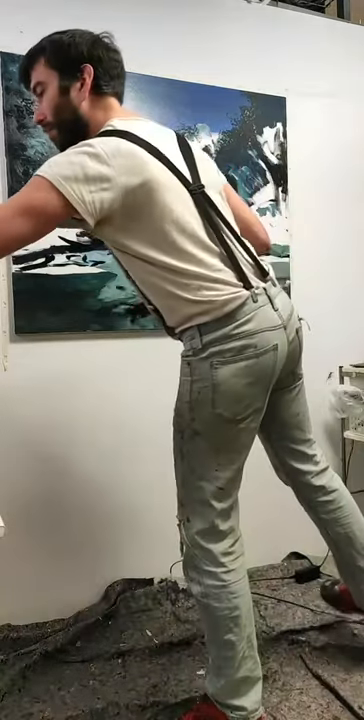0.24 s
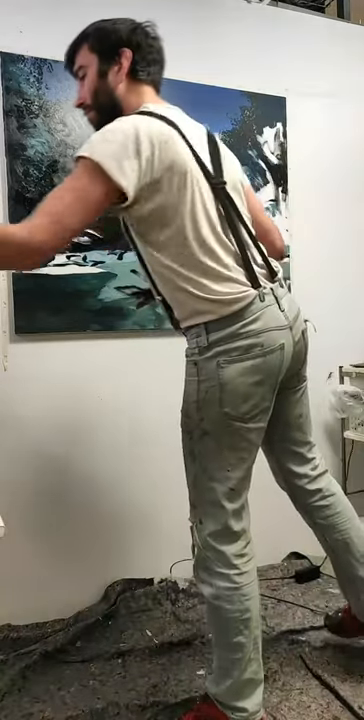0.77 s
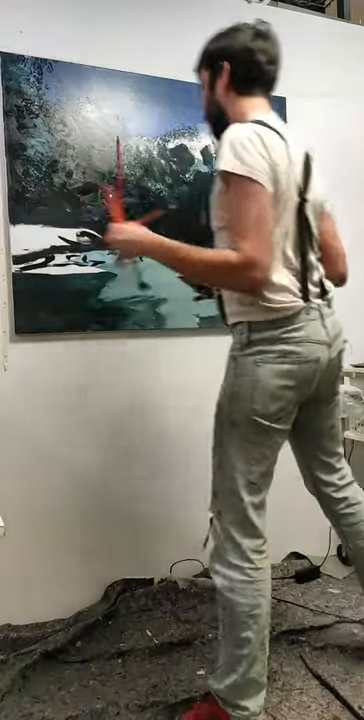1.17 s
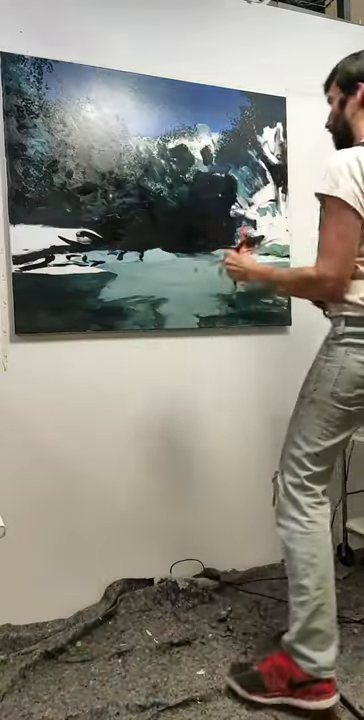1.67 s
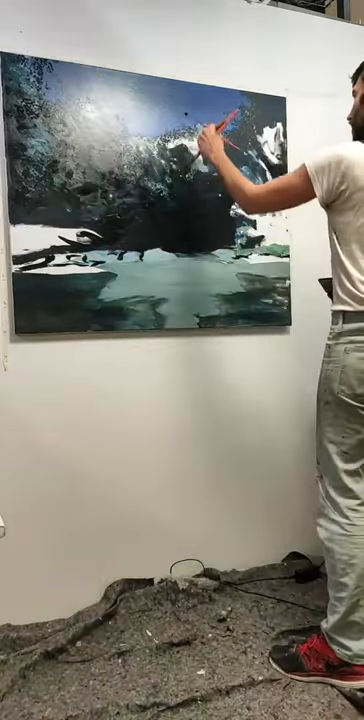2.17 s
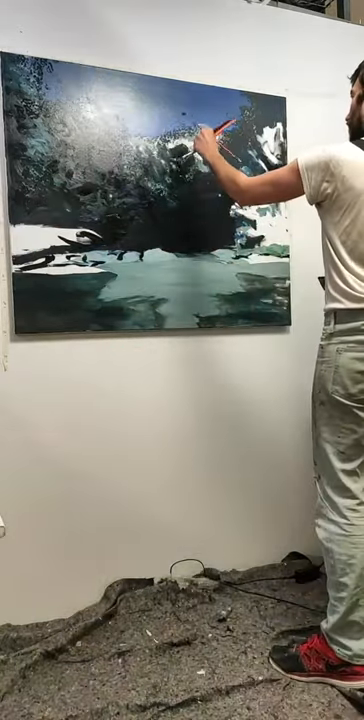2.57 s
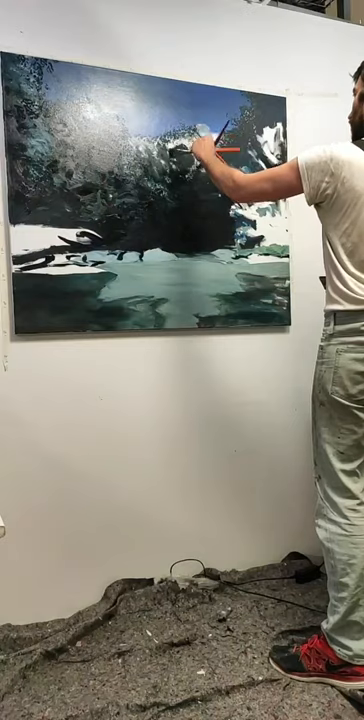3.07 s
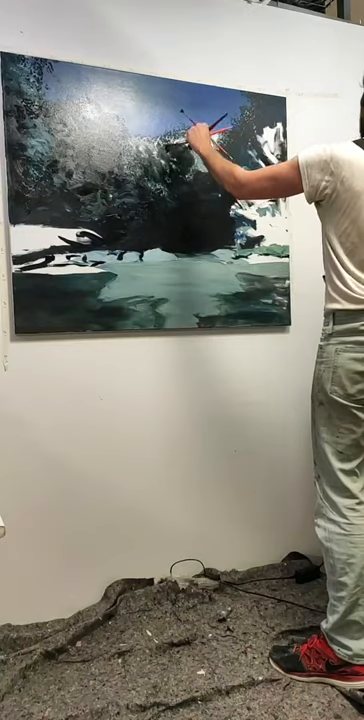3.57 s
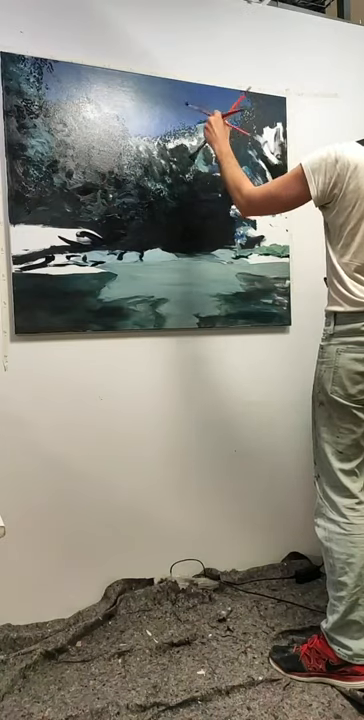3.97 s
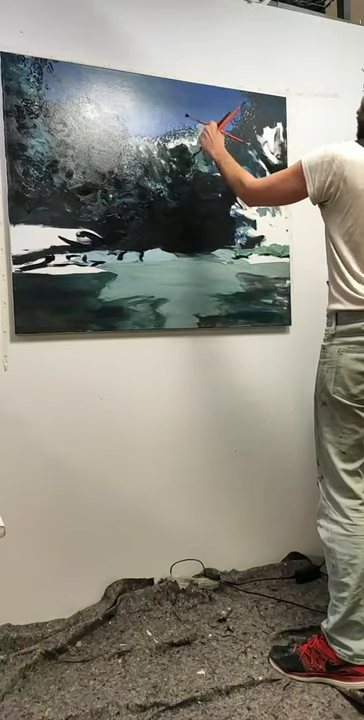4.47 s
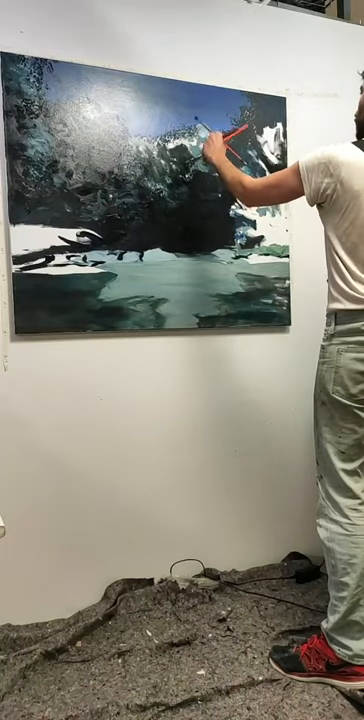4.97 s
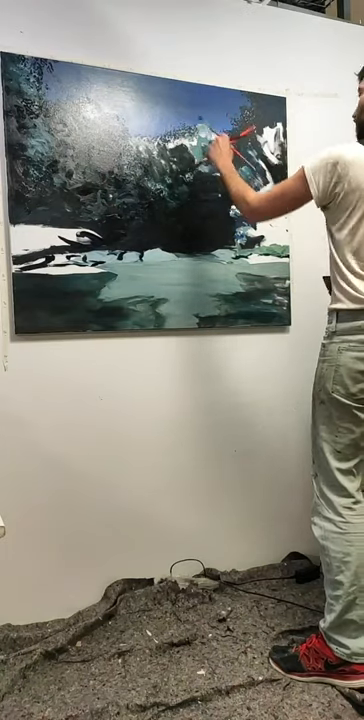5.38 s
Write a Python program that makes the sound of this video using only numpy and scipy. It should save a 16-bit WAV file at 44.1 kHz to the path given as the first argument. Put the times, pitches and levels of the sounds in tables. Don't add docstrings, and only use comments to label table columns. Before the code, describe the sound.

A small studio hums with soft ventilation: airy wash, deep wavering gusts near 56 Hz and a very faint fan tone throughout, the hiss settling over the first second or so. Tiny ticks at 0.1 s precede a short, jerky jar scrape shaking a wooden table at 0.31-0.4 s. At 1.1 s thin brush handles strike with the loudest sound, a bright double clack with a bounce, slight metal ring and short room echo. Clothes rustle around 1.35 and 1.75 s; softer wooden knocks fall at 1.5-1.6 s, a dull one at 1.83 s. From 2.3 to 3.4 s bristles scrub the canvas, faint at first, then quicker and crisper, with muffled cloth thumps and slow subsonic sway. Near quiet follows, with barely audible ticks around 4 s. Strokes return at 4.4-5.05 s, strongest from 4.7. Light rustle and a faint fuzzy squeak come near 5.4 s, then only hum.

```python
import sys
import numpy as np
from scipy import signal
from scipy.fft import rfft, irfft, next_fast_len
from scipy.io import wavfile
from scipy.ndimage import uniform_filter1d

SR = 44100
rng = np.random.default_rng(int(sys.argv[2]) if len(sys.argv) > 2 else 0)


def output_pcm(signal):
    pcm = np.clip(np.atleast_2d(signal).T, -1, 1) * 32767
    wavfile.write(sys.argv[1], SR, np.round(pcm).astype(np.int16))


def attenuation_scalar(level_db):
    decades = np.asarray(level_db, float) / 20
    return 10 ** decades


N = 248724
T = np.arange(N) / SR


def evened(x):
    return x / np.sqrt(np.mean(x ** 2) + 1e-20)


def read(points, hz):
    f, value = np.transpose(points)
    return np.interp(np.log(hz + 1), np.log(f + 1), value)


def colour(x, gain_db):
    size = next_fast_len(len(x))
    gain = attenuation_scalar(gain_db(np.fft.rfftfreq(size, 1 / SR)))
    return irfft(rfft(x, size) * gain, size)[:len(x)]


def favour(hz, centre_hz, octaves):
    return np.exp(-.5 * (np.log2(hz / centre_hz + 1e-3) / octaves) ** 2)


def resonate(x, hz, width):
    r = np.exp(-np.pi * width / SR)
    pole = r * np.exp(2j * np.pi * hz / SR)
    return 2 * signal.lfilter([1 - r], [1, -pole], x + 1e-18).real


def body(x, modes):
    out = 0
    for k, (hz, width, db) in enumerate(modes):
        out = out + (-1) ** k * attenuation_scalar(db) * resonate(x, hz, width)
    return out


def grit(per_s, spread_db):
    size = attenuation_scalar(spread_db * np.minimum(rng.exponential(1, N), 5)) * rng.standard_normal(N)
    return evened(size * (rng.random(N) < per_s / SR))


def speed(s, rise, fall):
    return np.exp(-.5 * ((T - s) / np.where(T < s, rise, fall)) ** 2)


def swells(rows, rise, fall):
    return sum(attenuation_scalar(db) * speed(s, rise, fall) for s, db in rows)


def patchy(x, patchy_db, frames, bins):
    z = signal.stft(x, nperseg=512)[2]
    across_hz = uniform_filter1d(rng.standard_normal(z.shape), bins, 0)
    patches = uniform_filter1d(across_hz, frames, 1)
    return signal.istft(z * attenuation_scalar(patchy_db * evened(patches)), nperseg=512)[1][:N]


def place(s, db, sound):
    out = np.zeros(N + len(sound))
    out[round(s * SR):][:len(sound)] = attenuation_scalar(db) * sound / abs(sound).max()
    return out[:N]


def knock(s, db, centre_hz, octaves, damping, modes):
    t, ring = T[:14000], 0
    for k, (hz, width, mode_db) in enumerate(modes):
        decay = np.exp(-np.pi * damping * width * t)
        level = favour(hz, centre_hz, octaves) * attenuation_scalar(mode_db)
        ring = ring + level * decay * np.sin(2 * np.pi * hz * t + k ** 2)
    return place(s, db, ring * np.minimum(t * 3000, 1))


# frequency in Hz, time to die by 60 dB in seconds.
ROOM_T60 = [(100, 0.54), (500, 0.43), (2000, 0.41), (5000, 0.33), (9000, 0.27), (14000, 0.2)]


def room(x):
    taps = np.zeros(SR // 2)
    at = np.arange(150, SR // 2 - 10, 10) + rng.integers(0, 10, (SR // 2 - 151) // 10)
    taps[at] = rng.choice([-1., 1.], at.shape)
    hz, t, z = signal.stft(taps, SR, nperseg=256)
    decay = attenuation_scalar(-60 * t / read(ROOM_T60, hz)[:, None])
    near_walls = 1 + 1.68 * np.exp(-t / 0.01)
    tail = signal.istft(z * decay * near_walls, SR, nperseg=256)[1]
    return signal.fftconvolve(x, tail / np.linalg.norm(tail))[:N]


# frequency in Hz, density in dB per Hz.
AIR_SPECTRUM = [(5, -3), (17, -1), (32, -18.5), (65, -11.5), (119, -21.5), (170, -20.5), (320, -21),
                (520, -28.5), (950, -27.5), (1400, -32), (2200, -36.5), (5000, -41.5), (9500, -46.5),
                (13500, -42.5)]


def air_wash():
    stir_db, still_db, settle_s = 10, -7, 1
    frames, hz = N // 256 + 5, np.fft.rfftfreq(1024, 1 / SR)
    patches = uniform_filter1d(rng.standard_normal((frames, 513)), 10, 0)
    patches_db = 1.5 * evened(uniform_filter1d(patches, 12, 1)).T
    treble_db = still_db + stir_db * np.exp(-np.arange(frames) * 256 / SR / settle_s)
    treble_share = np.clip(np.log2(hz / 700 + 0.011) / 2.4, 0, 1)[:, None]
    noise = rng.standard_normal((frames - 1) * 256)
    hiss = evened(colour(noise, lambda f: read(AIR_SPECTRUM, f)))
    z = signal.stft(hiss, nperseg=1024, noverlap=768)[2]
    z = z * attenuation_scalar(patches_db + treble_db * treble_share)
    return attenuation_scalar(-54.5) * signal.istft(z, nperseg=1024, noverlap=768)[1][:N]


# frequency in Hz, width in Hz, level in dB.
HUM_MODES = [(20.64, 3.3, -5.5), (30.1, 2.2, -6.5), (65.8, 5.4, -1), (90.3, 9, -7), (110.4, 7, -10),
             (197.4, 2.6, -18)]


def room_hum():
    hum = 0
    for hz, width, db in HUM_MODES:
        hum = hum + attenuation_scalar(db) * evened(resonate(rng.standard_normal(N), hz, width))
    return attenuation_scalar(-52.5) * hum


def wavering_tone(hz):
    return np.sqrt(2) * np.sin(2 * np.pi * np.cumsum(hz) / SR)


# peak time in seconds, level in dB.
GUSTS = [(.11, -60), (.54, -44.5), (.8, -50.5), (.98, -49), (1.2, -49.5), (1.4, -48.5), (1.64, -45.5),
         (1.88, -54), (2.19, -47), (2.55, -48.5), (2.87, -41.5), (3.07, -52), (3.33, -54), (3.58, -45.5),
         (3.86, -52.5), (4.15, -46.5), (4.45, -50.5), (4.64, -45), (4.8, -59), (4.96, -45), (5.12, -49),
         (5.3, -43), (5.63, -42.5)]


def gust_boom(waver):
    rise_s, fall_s, calm_db = 0.079, 0.07, -72
    return (swells(GUSTS, rise_s, fall_s) + attenuation_scalar(calm_db)) * wavering_tone(55.96 + 1.48 * waver)


# time in seconds, level in dB.
FAN_LEVEL = [(0, -66), (.35, -66), (.85, -84), (1.2, -64.5), (1.55, -67.5), (2.65, -61), (3.15, -65),
             (3.55, -59), (5.15, -62), (5.64, -68)]


def fan_whine(waver):
    level_db = np.interp(T, *np.transpose(FAN_LEVEL))
    return attenuation_scalar(level_db) * wavering_tone(149.4 + 1.3 * waver)


def ventilation():
    noise = air_wash() + room_hum()
    waver = evened(uniform_filter1d(rng.standard_normal(N), size=8000))
    return noise + gust_boom(waver) + fan_whine(waver[::-1])


# frequency in Hz, density in dB per Hz.
BRISTLE_SPECTRUM = [(600, -6.5), (1200, -8.5), (1800, -9.5), (2800, -8), (4100, -5), (5500, -5.5),
                    (6800, -4), (8300, -3), (11000, -6), (13500, -6)]


def rubbing(rows, per_s, spread_db):
    hiss = colour(grit(per_s, spread_db), lambda hz: read(BRISTLE_SPECTRUM, hz))
    hiss = evened(patchy(hiss, patchy_db=1.8, frames=4, bins=8))
    dull = colour(hiss, lambda hz: -10 * np.log10(1 + (hz / 5500) ** 4))
    bright = hiss - dull
    out = np.zeros(N)
    for s, db, rise, fall, bright_db in rows:
        blend = attenuation_scalar(-bright_db) * dull + attenuation_scalar(bright_db) * bright
        out += attenuation_scalar(db) * speed(s, rise, fall) * blend
    return out


# time of top speed in seconds, level in dB, rise in seconds, fall in seconds,
# brightness in dB (added to the bright share, taken off the dull one).
RUSTLE_STROKES = [(.03, -76, .02, 0.058, -9), (.13, -82, 0.021, 0.022, -3), (.233, -68, 0.0082, 0.018, -7),
                  (1.033, -56.5, 0.003, 0.041, -1.5), (1.348, -52, 0.015, 0.024, -1),
                  (1.383, -61, 0.014, 0.035, -4.5), (1.66, -60.5, 0.099, 0.029, -5),
                  (1.742, -49, 0.026, 0.029, -3), (1.94, -70.5, 0.033, 0.037, 2),
                  (1.83, -62, 0.035, 0.027, -5), (5.35, -64, 0.04, 0.03, -2),
                  (5.4, -65, 0.027, 0.033, -1.5), (5.535, -62, 0.007, 0.025, -1), (5.2, -73.5, .08, .1, 0),
                  (5.6, -71.5, 0.1, .1, -4), (1.27, -61.5, .04, 0.036, -1)]


def rustle():
    return rubbing(RUSTLE_STROKES, per_s=14000, spread_db=0.3)


# peak time in seconds, level in dB.
SQUEAK_RUBS = [
    (5.413, -68),
    (5.447, -71),
]


def squeak():
    whistle = evened(resonate(rng.standard_normal(N), 2200, 130))
    return swells(SQUEAK_RUBS, rise=.006, fall=0.015) * whistle


# frequency in Hz, width in Hz, level in dB.
TABLE_MODES = [(196, 71, -6.5), (295, 27, 0.5), (348, 43, 0), (452, 65, -2), (538, 137, -9),
               (680, 210, -12.5), (840, 110, -12.5), (1125, 150, -17), (1650, 180, -22.5), (2200, 190, -23),
               (2950, 530, -25.5)]


def jar():
    start_s, top_s, stop_s = .314, 0.345, .39
    start_db, top_db, stop_db, fade_db_per_s = -37, -30, -35, 415
    slip_db = np.interp(T, [start_s, top_s, stop_s], [start_db, top_db, stop_db])
    slip_db = slip_db - fade_db_per_s * np.maximum(T - stop_s, 0)
    gate = uniform_filter1d(1. * (T > start_s), size=100)
    slips = grit(per_s=2500, spread_db=0.0)
    wood = body(gate * attenuation_scalar(slip_db) * slips, TABLE_MODES) / np.std(body(slips, TABLE_MODES))
    fizz = colour(grit(per_s=15000, spread_db=-2.0), lambda hz: -3.0 * abs(np.log2(hz / 3000 + 0.056)))
    fizz_db = -43.5 + 1.5 * (slip_db - top_db)
    return wood + gate * attenuation_scalar(fizz_db) * evened(fizz)


# start in seconds, level in dB, favoured pitch in Hz, spread in octaves,
# decay in seconds.
DRY_TICKS = [(0.1058, -42.5, 1060, 0.3, 0.0018), (0.106, -41, 2750, .25, .002),
             (.125, -51, 384, 0.57, 0.044), (.256, -58, 4500, .5, 0.00078),
             (0.317, -40, 2780, 0.22, 0.0015), (1.0282, -47, 6000, 1.1, .006),
             (1.0953, -17, 5900, 1.6, 0.0042), (1.096, -22, 8500, 1.3, 0.021),
             (1.185, -48, 230, 0.15, 0.019), (1.381, -50, 9000, .5, .0006),
             (1.5021, -37, 2200, 1.2, 0.0015), (1.555, -36.5, 8950, 0.35, 0.0026),
             (1.559, -38.5, 4030, 0.089, .007), (1.628, -46, 2800, 0.65, 0.0012),
             (1.706, -57, 6500, .5, .001), (3.92, -63, 5500, 0.55, 0.0052), (4.02, -64, 4530, 0.73, .004),
             (5.405, -55, 2800, 0.57, 0.0032), (1.0962, -44, 1000, .4, 0.0019),
             (1.826, -44, 1320, .2, 0.0058), (1.505, -42.5, 2120, 0.097, .004)]


def tick(s, db, centre_hz, octaves, decay):
    lead, t = 200, T[:3000]
    burst = (1 + rng.standard_normal(len(t)) ** 2) * rng.choice([-1, 1], len(t))
    puff = np.r_[np.zeros(lead), burst * np.exp(-t / decay)]
    puff = colour(puff, lambda hz: 20 * np.log10(favour(hz, centre_hz, octaves) + 1e-5))
    return place(s - lead / SR, db, puff)


def dry_ticks():
    return sum(tick(*row) for row in DRY_TICKS)


# start in seconds, level in dB, favoured pitch in Hz,
# spread in octaves, grip damping factor.
FERRULE_BLOWS = [
    (1.0985, -24, 5500, 2.5, 1.7),
    (1.505, -39, 3800, 0.91, 1.2),
    (1.556, -47, 5000, .5, 1.1),
]
# frequency in Hz, width in Hz, level in dB.
FERRULE_MODES = [(3370, 20, 0.5), (4640, 12, -3), (5050, 4.5, -7), (5100, 6.8, -14), (7400, 18, -9),
                 (9400, 16, -9), (8920, 18, -5)]


def ferrule_rings():
    return sum(knock(*row, FERRULE_MODES) for row in FERRULE_BLOWS)


# start in seconds, level in dB, favoured pitch in Hz, spread in octaves,
# grip damping factor.
SOFT_BLOWS = [
    (1.5045, -24, 3750, 0.77, 1.3),
    (1.521, -38, 4200, 1.8, 3.4),
    (1.555, -32, 6500, 0.49, 2.8),
    (1.583, -45, 6030, 0.35, 1.4),
    (1.825, -41, 2500, 0.79, 3.5),
]
# frequency in Hz, width in Hz, level in dB.
THICK_HANDLE_MODES = [(1220, 46, -3.5), (1580, 210, 0), (2100, 210, -9.5), (3380, 130, 0), (4100, 270, -16),
                      (4730, 100, -19), (5090, 78, -7.5), (6860, 120, -8), (8600, 210, -5),
                      (10560, 270, -2), (12000, 500, -21)]


def soft_clacks():
    return sum(knock(*row, THICK_HANDLE_MODES) for row in SOFT_BLOWS)


# start in seconds, level in dB, favoured pitch in Hz, spread in octaves,
# grip damping factor.
HARD_BLOWS = [
    (1.0944, -19, 8500, 0.64, 2.1),
    (1.0986, -16, 5100, 1.2, 2.1),
    (1.1075, -27, 5000, 0.88, 1.5),
]
# frequency in Hz, width in Hz, level in dB.
HANDLE_MODES = [(1830, 220, -0.5), (2200, 350, 1.5), (2730, 180, -11), (3470, 140, -0.5), (4830, 88, -2),
                (5050, 140, 7), (5890, 210, 4.5), (6500, 330, 3.5), (7550, 200, 1), (8480, 190, 2.5),
                (9530, 89, 5), (10000, 330, 6.5), (11170, 390, 6), (12300, 880, -15)]


def handle_clacks():
    return sum(knock(*row, HANDLE_MODES) for row in HARD_BLOWS)


# peak time in seconds, rocking level in dB.
CANVAS_SHOVES = [
    (2.41, -33),
    (2.82, -30),
    (3.0, -43.5),
    (3.26, -36),
    (3.52, -41.5),
    (4.56, -37),
    (4.85, -39.5),
    (5.15, -47),
]


def canvas_sway():
    sway_hz, rise_s, fall_s, rest_db = 10.8, 0.082, .1, -55.5
    sway = np.sin(2 * np.pi * sway_hz * T) + 0.072 * np.sin(2 * np.pi * 3.1 * sway_hz * T)
    return np.sqrt(2) * (swells(CANVAS_SHOVES, rise_s, fall_s) + attenuation_scalar(rest_db)) * sway


# start in seconds, level in dB, favoured pitch in Hz.
LANDINGS = [(2.27, -44, 730), (2.583, -41, 520), (2.64, -52, 617), (3.269, -43.5, 710), (3.345, -52, 800),
            (4.405, -51, 560), (4.46, -47, 520), (4.605, -45.5, 680), (4.69, -46, 626), (4.79, -48.5, 680),
            (4.99, -47, 526)]
# frequency in Hz, width in Hz, level in dB.
CLOTH_MODES = [(524, 33, 4), (665, 79, 1.5), (817, 72, -1), (902, 110, -3.5), (1172, 29, 1),
               (1538, 28, -5.5)]


def brush_landings():
    return sum(knock(s, db, hz, 0.39, 1.0, CLOTH_MODES) for s, db, hz in LANDINGS)


# time of top speed in seconds, bristle hiss in dB, rise in seconds, brightness in
# dB (added to the bright share, taken off the dull one).
SCRUB_STROKES = [(2.31, -61, 0.031, -2), (2.385, -67, 0.024, -1.5), (2.609, -59, 0.018, .4),
                 (2.656, -58.5, 0.012, -1.5), (2.762, -59.5, 0.017, -2.5), (2.856, -47.5, 0.013, 0.7),
                 (2.97, -55.5, 0.02, -4), (3.074, -51.5, 0.016, -4), (3.171, -47.5, .015, -2),
                 (3.265, -45.5, 0.014, -2), (3.344, -45, 0.015, -0.4), (4.496, -56.5, 0.04, -5.5),
                 (4.62, -54.5, 0.021, -6), (4.701, -44, 0.015, -1.7), (4.823, -44, 0.022, -1.3),
                 (4.909, -45, 0.013, -0.4), (5.027, -45.5, 0.028, -.6)]


def canvas_scrub():
    drum_db, drum_per_hiss_db, usual_hiss_db = -57.5, 0.38, -51.5
    lead_s = 0.0055
    rows, press = [], 0
    for s, db, rise, bright_db in SCRUB_STROKES:
        fall = .019 + .35 * rise
        rows.append((s, db, rise, fall, bright_db))
        press_db = drum_db + drum_per_hiss_db * (db - usual_hiss_db)
        press = press + attenuation_scalar(press_db) * speed(s - lead_s, rise, fall + lead_s)
    hiss = rubbing(rows, per_s=14000, spread_db=1.3)
    weave = grit(per_s=1100, spread_db=0.5)
    drum = body(press * weave, CLOTH_MODES) / np.std(body(weave, CLOTH_MODES))
    return hiss + drum


def scene():
    scrub = canvas_scrub() + brush_landings()
    clacks = handle_clacks()
    soft = soft_clacks()
    ticks = dry_ticks()
    moves = rustle() + squeak()
    drag = jar()
    near = scrub + clacks + soft + ticks + moves + drag + ferrule_rings()
    to_room = attenuation_scalar(-5) * scrub + attenuation_scalar(5.5) * clacks + attenuation_scalar(1.0) * soft
    to_room = to_room + attenuation_scalar(-5.0) * ticks + attenuation_scalar(-13) * moves + attenuation_scalar(-10.5) * drag
    return (near + room(to_room) + canvas_sway() + ventilation())[None]


def roll_off(x):
    return signal.sosfilt(signal.butter(12, 15180, fs=SR, output="sos"), x)


# frequency in Hz, gain in dB.
BAND_LIMIT = [(13750, 0), (13950, -32), (15000, -38), (16000, -55)]


def record(dry):
    mix = colour(dry[0], lambda hz: read(BAND_LIMIT, hz))[None]
    return roll_off(mix)


dry = scene()
out = record(dry)
output_pcm(out)
```